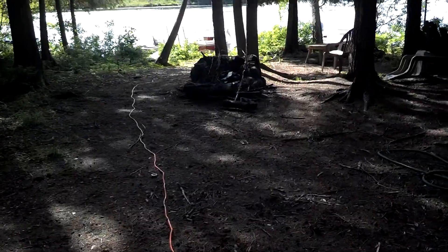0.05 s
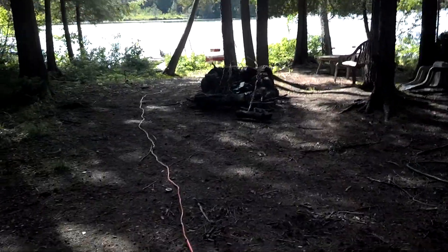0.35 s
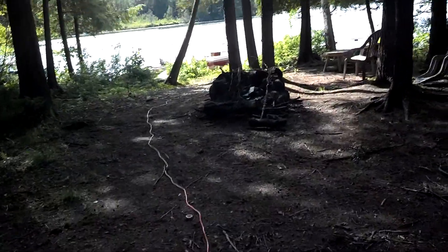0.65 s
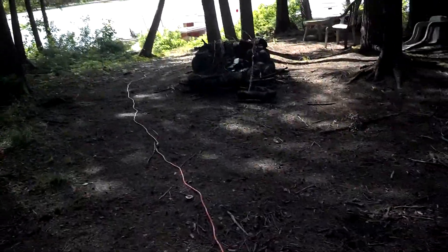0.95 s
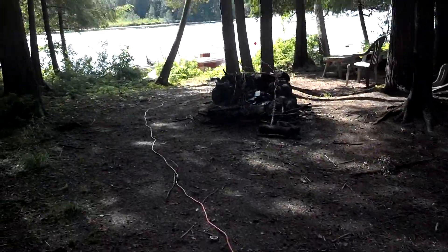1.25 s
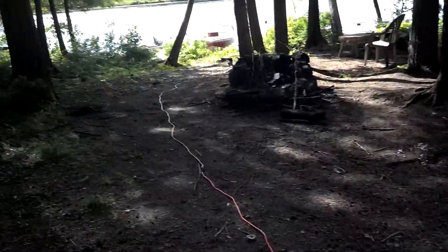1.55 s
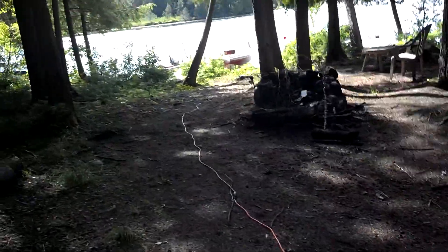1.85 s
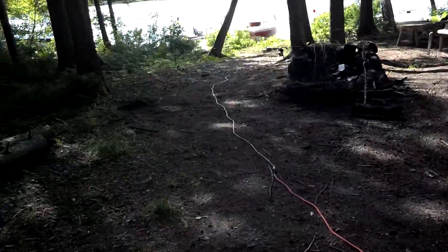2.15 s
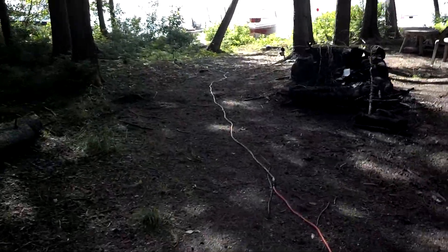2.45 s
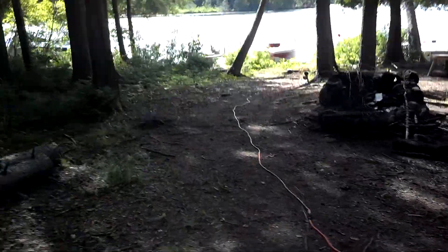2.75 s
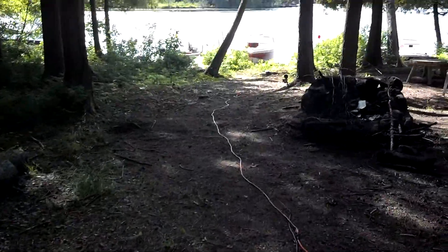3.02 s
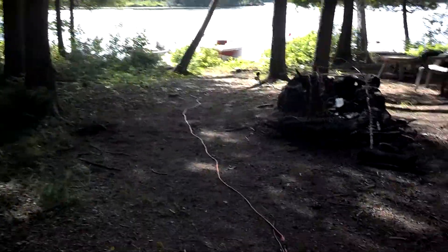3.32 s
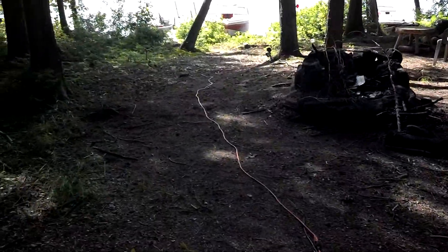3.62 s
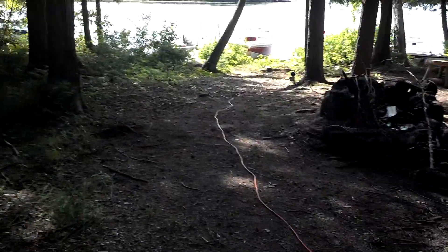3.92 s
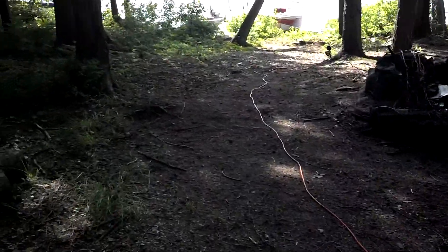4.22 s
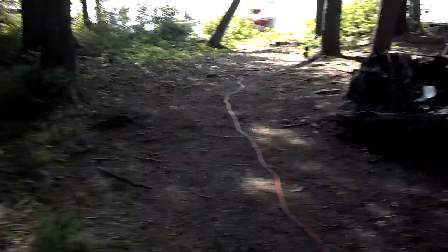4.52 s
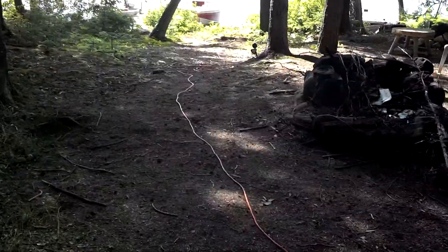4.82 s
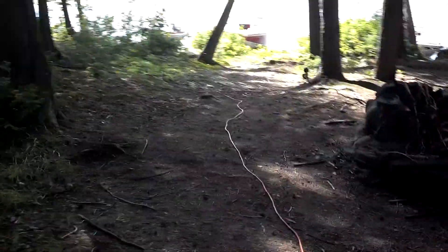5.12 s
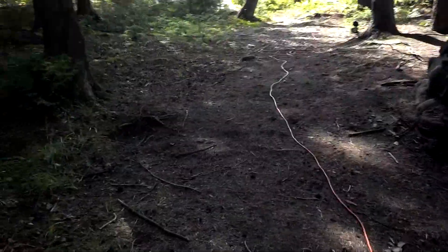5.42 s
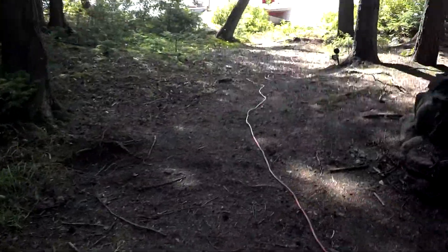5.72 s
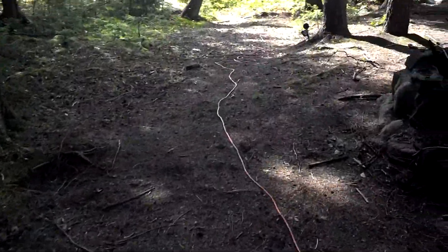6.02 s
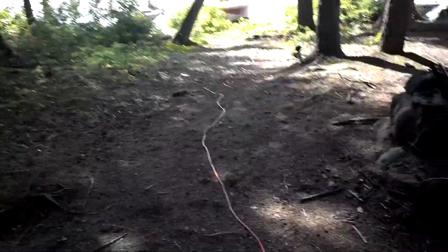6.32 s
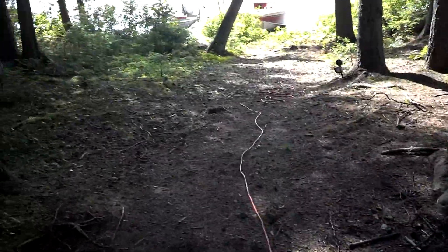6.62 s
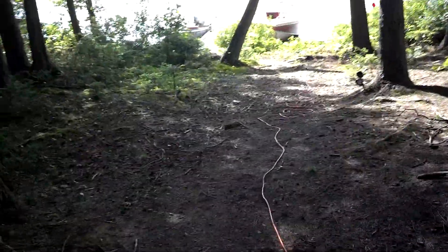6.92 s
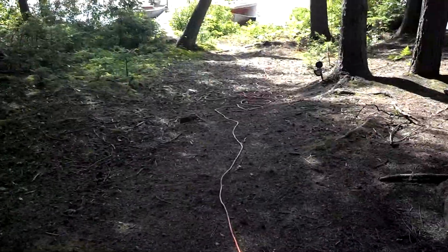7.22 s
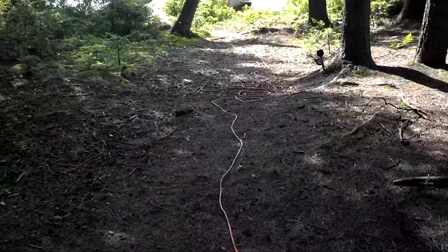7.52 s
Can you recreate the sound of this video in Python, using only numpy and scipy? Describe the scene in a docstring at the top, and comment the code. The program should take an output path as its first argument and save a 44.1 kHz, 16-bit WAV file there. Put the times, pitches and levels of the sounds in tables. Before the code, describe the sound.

Uneven footsteps crunch and rustle along a forest path, with small twigs cracking underfoot. Behind them a distant boat engine hums across a lake. Wind rumbles and knocks on the moving microphone, with two strong early gusts and lighter ones afterwards. In the second half the boat speeds up, its hum rising slightly, while the steps finish with two crisp scrapes through dry litter.

```python
"""A walk down a forest path toward a lake. From the start a motor boat drones through the trees and a
breeze rumbles, while shoes scuff dry needles and snap twigs. A faint peep passes, then gusts buffet the
microphone's right port, hardest near 1.3 and 2.7 s; gain control ducks the scene and lets it creep back.
From about 5 s the boat's throttle opens and its pitch climbs, and the walk ends on two bright scuffs.
The microphone makes stereo by subtracting each of its two ports, delayed, from the other."""
import sys
import numpy as np
from scipy import signal
from scipy.fft import rfft, irfft
from scipy.io import wavfile
from scipy.ndimage import uniform_filter1d

SR = 44100
rng = np.random.default_rng(int(sys.argv[2]) if len(sys.argv) > 2 else 0)


def generate_wav(sig):
    """Save sig (samples, or channels by samples) to the path in sys.argv[1] as 16-bit PCM at SR."""
    pcm = np.round(np.clip(np.atleast_2d(sig).T, -1, 1) * 32767).astype(np.int16)
    wavfile.write(sys.argv[1], SR, pcm)


N = 333396
TIME, HZ = np.arange(N) / SR, np.fft.rfftfreq(N, 1 / SR)

# Table levels are relative: each layer is trimmed where it is mixed.
# The engine's firing tone, pushed up by the throttle: time_s, pitch_hz
FIRING_PITCH = [(0, 355.5), (3.4, 357.3), (4.9, 358.4), (5.48, 364), (5.65, 369), (5.82, 375.2),
                (6.2, 374.8), (6.5, 380.4), (7.2, 379.5), (7.56, 393.5)]
# One fader ride for each of the first three firing harmonics: time_s, level_db
HARMONIC_RIDES = [
    [(.2, -61), (.4, -46.5), (1.1, -56.5), (1.75, -45.5), (1.95, -45), (2.15, -39.5), (2.38, -53.5),
     (3.05, -39.5), (3.35, -42), (3.62, -38.5), (3.88, -34), (4.1, -41.5), (4.45, -37), (4.72, -55.5),
     (4.92, -40), (5.4, -39.5), (5.8, -29.5), (6.05, -38.5), (6.6, -33.5), (7, -30), (7.56, -36.5)],
    [(0, -55.5), (.25, -44), (.75, -56), (1.15, -45.5), (1.6, -60), (2.05, -50.5), (3.85, -49), (4.3, -65),
     (5.2, -67), (5.8, -65), (6.8, -57.5), (7.4, -53.5)],
    [(0, -58.5), (1.6, -61), (2.4, -59.5), (3.8, -51), (4, -40), (4.17, -48), (4.7, -51), (4.9, -56.5),
     (5.15, -46), (5.47, -58.5), (5.83, -42.5), (6.1, -53), (6.42, -45.5), (6.65, -54.5), (7.03, -45.5),
     (7.35, -65)],
]
# Crankshaft and gear tones, riding on SHAFT_RIDE: shaft_multiple, cruise_db, open_throttle_db
SHAFT_PARTIALS = [(3.007, -9, 2), (5.05, -8, -7.5), (5.33, -6, -5.5), (6.47, -5, -8.5), (6.93, -16, -10.5),
                  (6.86, -5, -10.5), (13.02, -9, -10.5), (13.97, -15, -19), (14.83, -12, -15),
                  (16.14, -13.5, -12), (16.86, -25, -13), (19.03, -19.5, -13.5), (19.74, -16, -12.5),
                  (21, -9, -18.5), (24.06, -17, -13), (25.7, -36, -15.5), (29.4, -23, -23)]
# Those tones swell and fade together between the trunks: time_s, level_db
SHAFT_RIDE = [(0, -53), (2.4, -59), (3.2, -53.5), (4.1, -46), (4.8, -50.5), (5.8, -46), (6.5, -47.5),
              (7.56, -46.5)]
# Thin, rough gear whine: shaft_multiple, level_db
WHINE_PARTIALS = [(36.1, -70), (37.05, -68.5), (38.1, -71.5)]
# Rough drone under the firing tone, likely the propeller drive: time_s, level_db
DRONE_RIDE = [(0, -66), (2.5, -80), (3.3, -54), (3.8, -59), (4.25, -46), (5, -46.5), (5.8, -42.5),
              (6.2, -41.5), (7, -48), (7.56, -46.5)]
# Exhaust and wake heard through the trees: frequency_hz, gain_db
ROAR_EQ = [(40, -39.5), (100, -5), (180, 5.5), (380, -3), (520, -6), (800, -4), (1200, -10), (1700, -9.5),
           (2300, -8.5), (4000, -23.5), (7000, -30), (16000, -92)]
# Their roar grows as the lake comes nearer: time_s, level_db
ROAR_RIDE = [(0, -52.5), (1.2, -52.5), (2.4, -52), (3.2, -48), (4.3, -47.5), (4.8, -50.5), (5.8, -46),
             (6.5, -48.5), (7.56, -47.5)]
# Low rumble of light air: frequency_hz, gain_db
BREEZE_EQ = [(25, -16), (52, -20.5), (80, -11.5), (105, -1.5), (135, 0), (200, -4.5), (300, -19.5),
             (450, -16), (800, -32.5), (2000, -60.5), (16000, -100)]
# The breeze dies down along the path: time_s, level_db
BREEZE_RIDE = [(0, -41), (.55, -49), (1.1, -33.5), (1.5, -44.5), (2.3, -47), (3.1, -44.5), (3.8, -39.5),
               (4.7, -55.5), (5.3, -50), (6.7, -56.5), (7.56, -58)]
# Shoes and trouser legs brushing dry litter: frequency_hz, gain_db
LITTER_EQ = [(100, -43), (600, 9), (2000, 13), (4100, 7), (5500, 1), (7000, -6.5), (9700, -5),
             (11000, -7.5), (12700, 1), (15000, 4.5), (16000, 3)]
# Running rustle of litter and clothes: time_s, level_db
RUSTLE_RIDE = [(0, -86), (.45, -68), (.65, -71), (1.25, -64.5), (2.05, -70), (3.1, -67), (4.25, -66.5),
               (4.65, -58.5), (5.22, -61.5), (5.45, -61.5), (5.7, -66.5), (6.1, -61.5), (6.5, -67.5),
               (6.93, -64.5), (7.2, -48.5), (7.56, -51)]
# A shoe sweeps through needles: peak_s, length_s, level_db, tilt_db_per_octave
SCUFF_CUES = [(0.042, 0.34, -48.5, 6.5), (0.546, 0.019, -48, 1), (0.614, 0.18, -49.5, 1),
              (1.084, 0.058, -45, 4.5), (1.237, 0.03, -50, -3), (1.556, 0.028, -40, -3.5),
              (1.796, 0.13, -51.5, 0), (3.581, 0.54, -48, -6), (3.895, 0.087, -43, -3),
              (4.13, 0.093, -46, -4), (4.344, 0.11, -37.5, 0), (4.507, 0.068, -38.5, 0),
              (4.814, 0.063, -40, 3.5), (5.88, 0.1, -44, 0), (5.988, 0.2, -42.5, 6.5),
              (6.268, 0.07, -43.5, -2), (6.492, 0.26, -51, -3), (6.981, 0.05, -44, 0), (7.06, 0.14, -51, 4),
              (7.254, 0.13, -35.5, 4.5), (7.42, 0.24, -34.5, 13)]
# Twigs, cones and grit underfoot: start_s, level_db, decay_s, tilt_db_per_octave
TWIG_CUES = [(0.0533, -26, .001, 12), (.114, -31.5, 0.0013, 4), (.186, -40, .002, 7),
             (0.382, -45, 0.016, -4), (0.5423, -38, 0.0033, -6), (0.595, -32.5, 0.0069, -25),
             (0.6104, -33.5, 0.0018, 0), (0.7143, -33.5, 0.0018, 1.5), (.773, -38, .0015, 4),
             (0.79, -27.5, 0.0019, -26), (.79, -31, .001, 13.5), (1.003, -32, 0.0013, 11),
             (1.007, -30.5, 0.0012, 4), (1.077, -35, .0015, 10), (1.133, -39, .0015, 6),
             (1.323, -27, 0.0019, -28), (1.84, -40.5, 0.0017, -2), (2.796, -33, .003, -3.5),
             (2.9, -27.5, 0.0026, -15), (4.081, -38, .002, -6.5), (4.165, -38, .003, -3),
             (4.8165, -36, .0015, 9), (5.0793, -22.5, 0.0012, 0), (5.8403, -35, 0.0013, -3),
             (5.877, -28, 0.0024, -4), (7.287, -27, 0.001, -9)]
# Eddies hitting the right port: peak_s, length_s, level_db
GUST_CUES = [(.19, .05, -32.5), (0.29, 0.035, -29), (0.366, 0.014, -24), (0.615, 0.023, -23.5),
             (0.68, 0.033, -28.5), (0.709, 0.011, -25), (0.802, 0.03, -30), (1.009, 0.015, -21.5),
             (1.053, 0.024, -25), (1.104, .015, -26.5), (1.19, 0.03, -26.5), (1.261, 0.01, -11.5),
             (1.281, 0.013, -12), (1.309, 0.014, -3.5), (1.378, 0.014, -26), (2.533, 0.0097, -28),
             (2.703, 0.015, -12.5), (2.736, 0.042, -4), (2.876, .018, -18.5), (2.902, 0.023, -18),
             (3.303, 0.046, -31.5), (3.688, 0.039, -35), (4.401, 0.034, -37), (4.468, 0.045, -24.5),
             (4.522, 0.032, -10.5), (5.095, 0.023, -19.5), (5.384, 0.06, -23.5), (5.836, 0.043, -31),
             (5.893, 0.046, -19.5), (5.972, 0.045, -20), (6.05, 0.039, -15.5), (6.125, 0.063, -22.5),
             (6.611, 0.019, -20.5), (6.677, 0.041, -19), (6.724, 0.021, -21.5), (7.075, 0.02, -20),
             (7.202, 0.057, -24.5), (7.538, 0.033, -31.5)]
# Sharp pressure snaps inside the gusts: peak_s, level_db
BUFFET_CUES = [(.366, -9.5), (0.371, -12), (0.612, -14.5), (0.6192, -7.5), (0.706, -14.5), (1.007, -21),
               (1.037, -16.5), (1.259, 2.5), (1.279, -1), (1.292, -8), (1.308, 5), (2.694, -9), (2.702, -5),
               (2.709, 0.5), (2.727, 2.5), (2.732, 2.5), (2.742, 1), (2.748, 1.5), (2.758, -1.5),
               (2.903, -3.5), (4.512, -8.5), (4.523, -11), (4.527, -5.5), (5.101, -13.5), (5.388, -7),
               (5.902, -4.5), (5.914, -5.5), (5.992, -9), (6.031, -11), (6.043, -10.5), (6.063, -4),
               (6.133, -7), (6.614, -7), (6.651, -7.5), (6.661, -7.5), (6.692, -9), (6.725, -7.5),
               (6.734, -12), (7.07, -8.5), (7.081, -7), (7.195, -9), (7.214, -7.5)]

PORT_DELAY_S = 0.000361


def amp(db):
    """Decibels to gain."""
    return 10 ** (np.asarray(db) / 20)


def unit_rms(x):
    """Scales to rms 1."""
    return x / np.sqrt(np.mean(x ** 2) + 1e-20)


def ride(rows):
    """An automation curve: straight lines through (time_s, value) points."""
    return np.interp(TIME, *np.transpose(rows))


def eq(points, hz):
    """Gain of an EQ curve drawn on a log-frequency axis."""
    points_hz, db = np.transpose(points)
    return amp(np.interp(np.log(hz + 1), np.log(points_hz + 1), db))


def bell(hz, centre_hz, width_hz, db):
    """Gain of one resonance that stands db above flat."""
    return 1 + (amp(db) - 1) / (1 + ((hz - centre_hz) / width_hz) ** 2)


def noise(gain):
    """Noise of rms 1 with the given gain over frequency."""
    return unit_rms(irfft(rfft(rng.standard_normal(N)) * gain, N))


def wander(rate_hz):
    """A random modulator of rms 1, moving at up to about rate_hz."""
    return noise(np.exp(-(HZ / rate_hz) ** 2))


def add(mix, start_s, sound):
    """Mixes a sound in from start_s."""
    part = mix[..., max(round(start_s * SR), 0):][..., :sound.shape[-1]]
    part += sound[..., :part.shape[-1]]


def diffuse(pair, gain, spacing):
    """Sound from all sides: the ports share the bass and hear unrelated treble."""
    coherence = np.sinc(2 * HZ * PORT_DELAY_S * spacing)
    mid, side = rfft(pair) * gain * np.sqrt([(1 + coherence) / 2, (1 - coherence) / 2])
    return unit_rms(irfft(np.array([mid + side, mid - side]), N))


def engine_tone(turns, flutter, rough, width):
    """One tone at both ports; uneven firing roughens it, paths between the trunks make it flutter."""
    mid = 1 + flutter * (wander(7.6) + 1j * wander(16)) + rough * wander(49)
    side = width * (wander(1.4) + 1j * wander(0.98))
    return np.sqrt(2) * (np.array([mid + side, mid - side]) * np.exp(2j * np.pi * turns)).real


def roar(shaft_turns, throb_depth=0.15, throb_below_hz=1800):
    """Exhaust and wake: a wash of noise whose low end throbs with each turn of the shaft."""
    wash = diffuse(rng.standard_normal((2, N)), eq(ROAR_EQ, HZ), spacing=0.86)
    lows = irfft(rfft(wash) / (1 + (HZ / throb_below_hz) ** 4), N)
    throb = throb_depth * np.cos(2 * np.pi * shaft_turns) * lows
    return amp(ride(ROAR_RIDE) + 7 + 1.4 * wander(8.6)) * (wash + throb)


def boat(cylinders=6, open_throttle_hz=364.5, drone_multiple=4.31):
    """Firing harmonics, shaft tones, gear whine and a drone all follow the revs, over the roar."""
    firing_hz = ride(FIRING_PITCH)
    firings = np.cumsum(firing_hz * (1 + 0.00208 * wander(6.83))) / SR
    shaft_turns = firings / cylinders
    throttle = np.clip((firing_hz - firing_hz[0]) / (open_throttle_hz - firing_hz[0]), 0, 1)
    firing = shaft = whine = 0
    for k, levels in enumerate(HARMONIC_RIDES, 1):
        tone = engine_tone(k * firings, flutter=0.087 + 0.03 * k, rough=0.12 + 0.12 * k, width=0.13 * k)
        firing += amp(ride(levels) - 0.1) * tone
    for k, cruise_db, open_db in SHAFT_PARTIALS:
        tone = engine_tone(k * shaft_turns + rng.random(), flutter=0.44, rough=0.66, width=0.032 * k)
        shaft += amp(cruise_db + throttle * (open_db - cruise_db)) * tone
    for k, db in WHINE_PARTIALS:
        tone = engine_tone(k * shaft_turns + rng.random(), flutter=0.55, rough=0.74, width=0.5)
        whine += amp(db) * tone
    drone = engine_tone(drone_multiple * shaft_turns, flutter=0.44, rough=0.51, width=0.13)
    engine = firing + whine + amp(ride(DRONE_RIDE)) * drone + amp(ride(SHAFT_RIDE)) * shaft
    return engine + roar(shaft_turns)


def breeze(stir_s=0.11, lead_s=0.012, lee_db=-22):
    """Light air rumbles on the right port and stirs round every gust; the left port lies in the lee."""
    power = amp(ride(BREEZE_RIDE)) ** 2
    for peak_s, _, db in GUST_CUES:
        power += amp(-36 + 0.24 * db) ** 2 * np.exp(-2 * ((TIME - peak_s + lead_s) / stir_s) ** 2)
    windward = unit_rms(amp(0.42 * wander(13)) * noise(eq(BREEZE_EQ, HZ)))
    lee = amp(lee_db) * noise(eq(BREEZE_EQ, HZ))
    return amp(3) * np.sqrt(power) * np.array([lee, windward])


def ticks(shape, per_second, spread_db):
    """Tiny clicks of uneven size, a separate set for each port."""
    sizes = amp(spread_db * np.minimum(rng.exponential(1, shape), 5))
    return rng.standard_normal(shape) * sizes * (rng.random(shape) < per_second / SR)


def rustle():
    """A running bed of litter and clothes, with single needles ticking out of it."""
    bed = unit_rms(ticks((2, N), per_second=8300, spread_db=0))
    needles = amp(-11) * unit_rms(ticks((2, N), per_second=46, spread_db=-1.5))
    level = amp(ride(RUSTLE_RIDE) + 11.5 + 0.88 * wander(35))
    return level * diffuse(bed + needles, eq(LITTER_EQ, HZ), spacing=3.6)


def litter_colour(clicks, tilt):
    """Voices clicks as dry needles, with the treble tilted in dB per octave."""
    hz = np.fft.rfftfreq(clicks.shape[-1], 1 / SR)
    octaves = np.log2(np.maximum(hz, 1800) / 5000)
    return irfft(rfft(clicks) * eq(LITTER_EQ, hz) * amp(tilt * octaves))


def scuffs(rise_share=0.47, fall_share=1.14):
    """A sole bites quickly into breaking needles and lets go slowly, with grit ticking through."""
    out, t = np.zeros((2, N)), np.arange(SR // 2) / SR - 1 / 8
    sole_note = bell(np.fft.rfftfreq(len(t), 1 / SR), centre_hz=4050, width_hz=150, db=3)
    for peak_s, length_s, db, tilt in SCUFF_CUES:
        grit = amp(-12.5) * unit_rms(ticks((2, len(t)), per_second=88, spread_db=-3))
        needles = unit_rms(ticks((2, len(t)), per_second=9000, spread_db=1))
        crunch = unit_rms(irfft(rfft(litter_colour(needles + grit, tilt)) * sole_note))
        swell = np.exp(-2 * (t / (length_s * np.where(t < 0, rise_share, fall_share))) ** 2)
        add(out, peak_s + t[0], (amp(db) * swell * crunch)[:, t > -peak_s])
    return out


def twigs(crack_share=0.79, crack_pan=(0.3, 1)):
    """Each twig gives one sharp crack, then splinters in a short, dry burst."""
    out, lead = np.zeros((2, N)), 256  # samples ahead of the crack
    t = np.maximum(np.arange(-lead, 16 * lead), 0) / SR
    for start_s, db, decay_s, tilt in TWIG_CUES:
        fade = np.exp(-t / decay_s) * (1 - np.exp(-6 * t / decay_s))
        splinters = ticks((2, len(t)), per_second=9900, spread_db=-2) * fade
        splinters[:, lead] = crack_share * np.linalg.norm(splinters, axis=1) * crack_pan
        burst = unit_rms(litter_colour(splinters, tilt)) * np.sqrt(np.mean(fade ** 2))
        add(out, start_s - lead / SR, amp(db + 1) * burst)
    return out


def peep(start_s=0.128, length_s=0.055, from_hz=1920, to_hz=1560):
    """A faint whistle that slides down, likely a far bird."""
    out, hz = np.zeros(N), np.linspace(from_hz, to_hz, round(length_s * SR))
    whistle = np.sqrt(2) * np.sin(2 * np.pi * np.cumsum(hz) / SR)
    add(out, start_s, amp(-54) * signal.windows.tukey(len(hz)) * whistle)
    return out


def vortices(per_second, jitter=0.75, spread_db=3.5):
    """An uneven train of pressure kicks, one for each vortex that the port sheds."""
    drift = unit_rms(uniform_filter1d(rng.standard_normal(len(per_second)), size=160))
    shed = np.cumsum(per_second * np.exp(jitter * drift - jitter ** 2 / 2)) / SR
    kicks = np.diff(np.floor(rng.random() + shed), prepend=0)
    return kicks * amp(spread_db * np.clip(rng.standard_normal(len(shed)), -2, 2))


def gusts(db_per_octave=23.5, fall_share=0.65, vortices_per_cycle=0.8):
    """Each eddy is a dull swell round thudding vortices; a harder one is brighter and sheds faster."""
    out, t = np.zeros(N), np.arange(-8192, 8192) / SR
    hz = np.fft.rfftfreq(len(t), 1 / SR) + 1
    port_hoot = bell(hz, centre_hz=530, width_hz=29, db=2.5)
    for peak_s, length_s, db in GUST_CUES:
        centre_hz = 510.6 * 2 ** (db / db_per_octave)
        low_cut_hz = 72 + 0.21 * centre_hz
        band = port_hoot / np.sqrt((1 + (low_cut_hz / hz) ** 8) * (1 + (hz / 2200) ** 8))
        dull, bright = (band / np.sqrt(1 + (hz / (k * centre_hz)) ** 6.14) for k in (0.85, 1.3))
        swell = 1 / (1 + (abs(t) / (0.95 * length_s * np.where(t < 0, 1, fall_share))) ** 3)
        thuds = unit_rms(vortices(vortices_per_cycle * centre_hz * (0.5 + 0.5 * swell)))
        churn = 0.52 * rng.standard_normal(len(t))
        core = np.exp(-(abs(t) / (0.68 * length_s)) ** 3) * (thuds + churn)
        skirt = 0.67 * swell * rng.standard_normal(len(t))
        eddy = irfft(rfft(skirt) * dull + rfft(core) * bright)
        eddy *= amp(db) / np.sqrt(np.mean(eddy[abs(t) < length_s / 2] ** 2))
        add(out, peak_s + t[0], eddy[t > -peak_s])
    return out


def buffets(db_per_halving=7, widest_s=0.00089):
    """A vortex core slaps the port: a spike between two shallow troughs, narrower when harder."""
    out, t = np.zeros(N), np.arange(-512, 512) / SR
    for peak_s, db in BUFFET_CUES:
        width_s = min(0.00031 * 2 ** (-db / db_per_halving), widest_s)
        offset_squared = (t / width_s) ** 2
        add(out, peak_s + t[0], amp(db) * (1 - offset_squared) * np.exp(-offset_squared / 2))
    return out


def gain_control(ports, threshold_db=-25, share=0.62, recover_db_per_s=6.5, start_duck_db=7.5):
    """Starts out ducked; a hard gust pulls both ports down together, then the level creeps back."""
    sense_s, attack_s = 0.013, 0.0072
    power = uniform_filter1d((ports ** 2).max(0), size=round(sense_s * SR))
    wanted_db = share * np.maximum(10 * np.log10(abs(power) + 1e-12) - threshold_db, 0)
    recovery_db = recover_db_per_s * TIME
    held_db = np.maximum(np.maximum.accumulate(wanted_db + recovery_db), start_duck_db) - recovery_db
    pole = np.exp(-1 / (attack_s * SR))
    duck_db = start_duck_db + signal.lfilter([1 - pole], [1, -pole], held_db - start_duck_db)
    return ports * amp(-duck_db)


def scene():
    """Pressure at the left and right ports; the right is a little more open and takes the gusts."""
    ports = (boat() + rustle() + scuffs() + twigs() + peep()) * amp([[-1.2], [1.2]]) + breeze()
    ports[1] += amp(0.09) * gusts() + amp(-2) * buffets()
    return ports


def record(dry, high_cut_hz=15780):
    """Gain control, then steady hiss; each port minus the other, delayed; a bass boost and a high cut."""
    hiss = amp(-79) * rng.standard_normal(dry.shape)
    ports, hz = rfft(gain_control(dry) + hiss, 2 * N), np.fft.rfftfreq(2 * N, 1 / SR)
    beams = ports - np.exp(-2j * np.pi * hz * PORT_DELAY_S) * ports[::-1]
    boost = 1 / (2 * np.sin(np.pi * np.clip(hz * PORT_DELAY_S, 0.03, 0.5)))  # restores cancelled bass
    stereo = irfft(beams * boost)[:, :N] * amp([[-0.2], [0.2]])
    high_cut = signal.firwin(511, high_cut_hz, window=("kaiser", 9), fs=SR)
    return signal.oaconvolve(stereo, high_cut[None], "same")


dry = scene()
out = record(dry)
generate_wav(out)
```